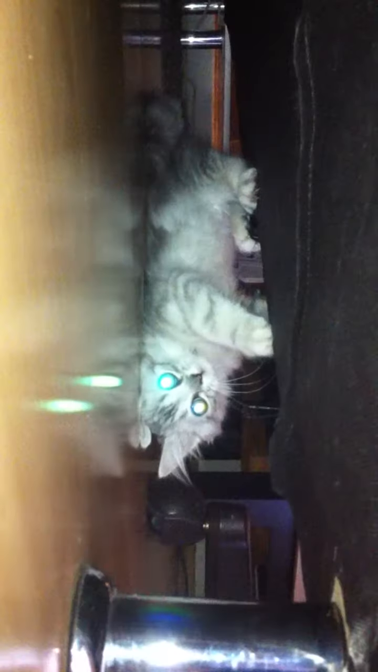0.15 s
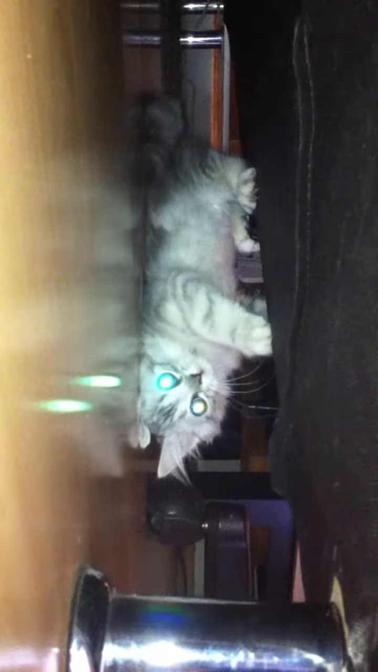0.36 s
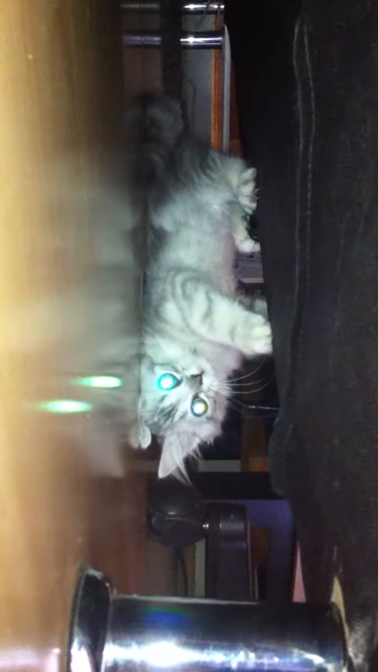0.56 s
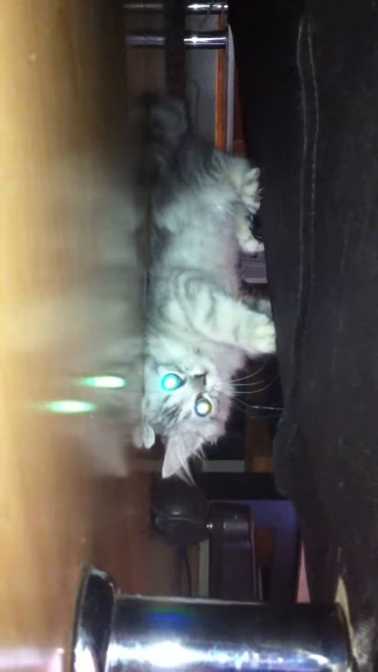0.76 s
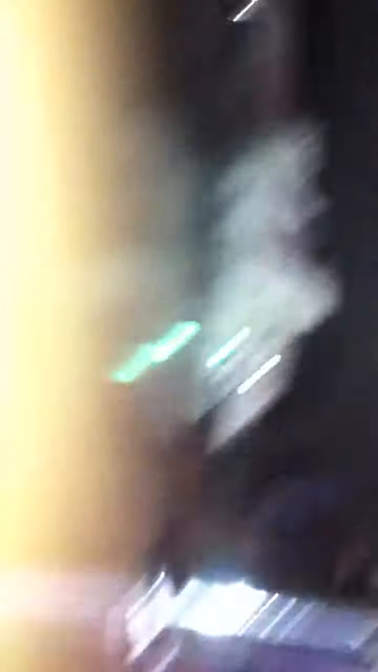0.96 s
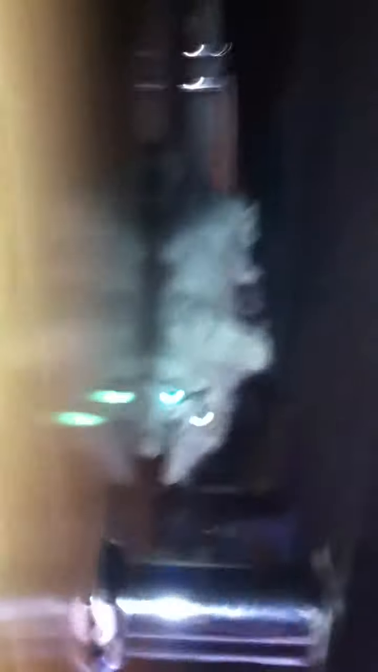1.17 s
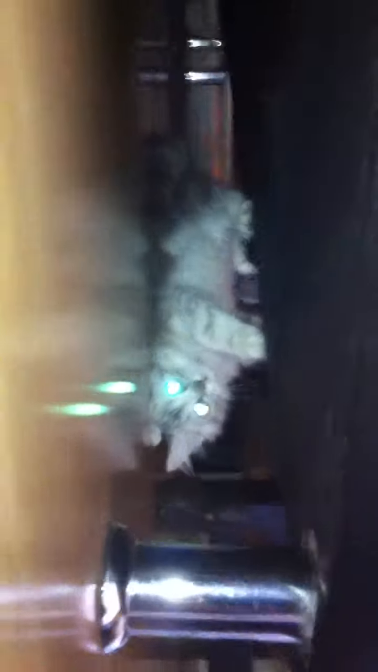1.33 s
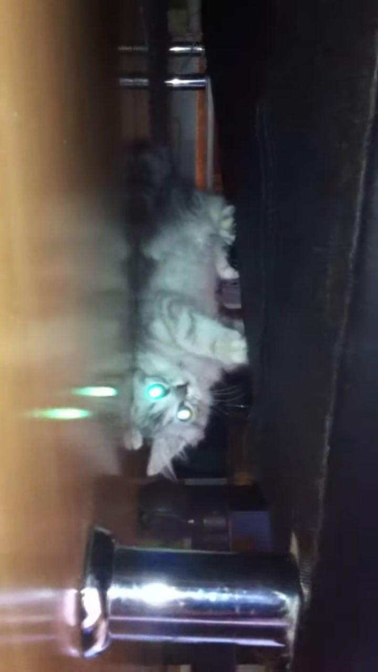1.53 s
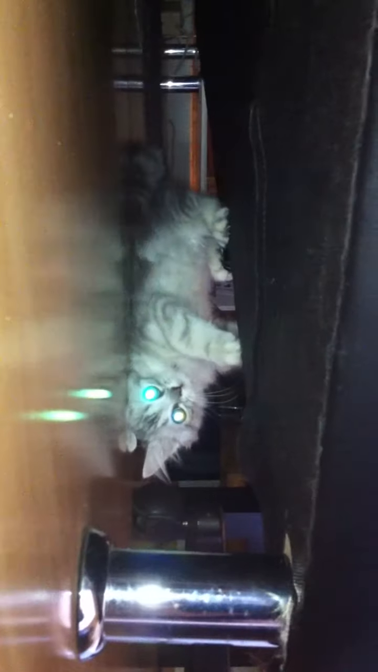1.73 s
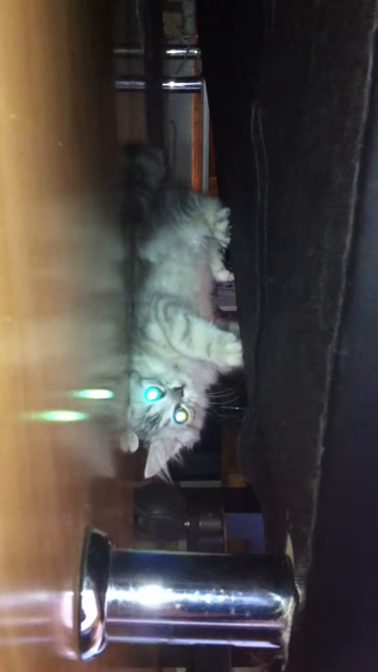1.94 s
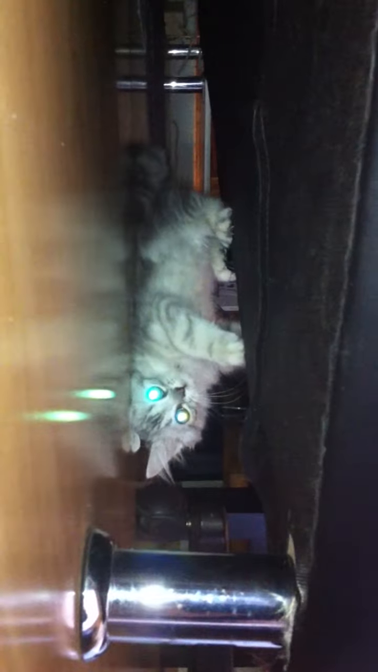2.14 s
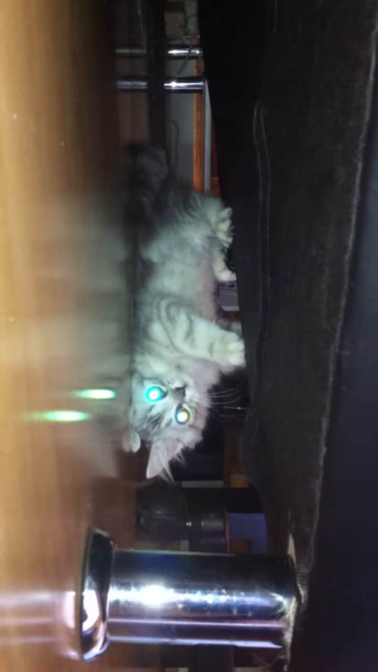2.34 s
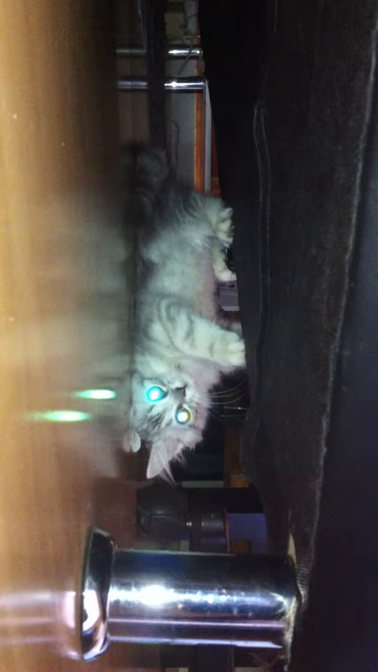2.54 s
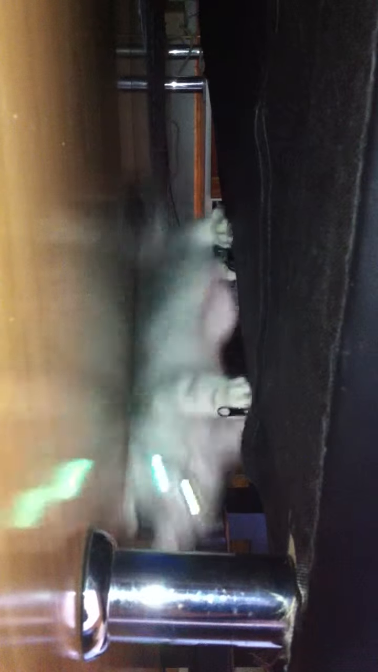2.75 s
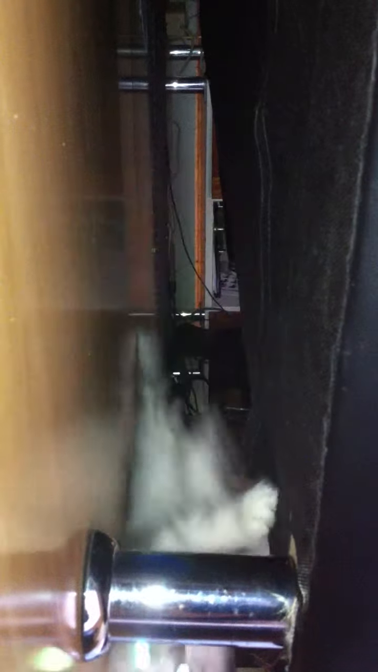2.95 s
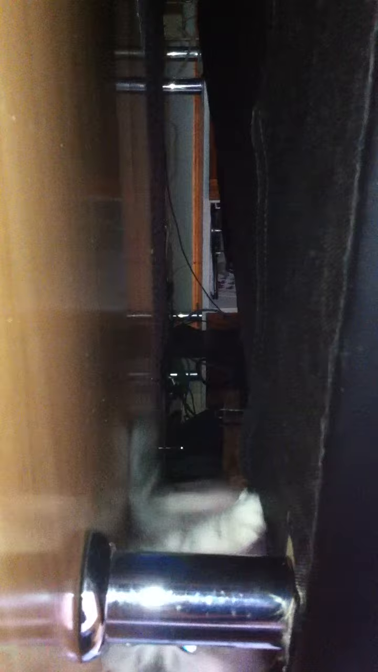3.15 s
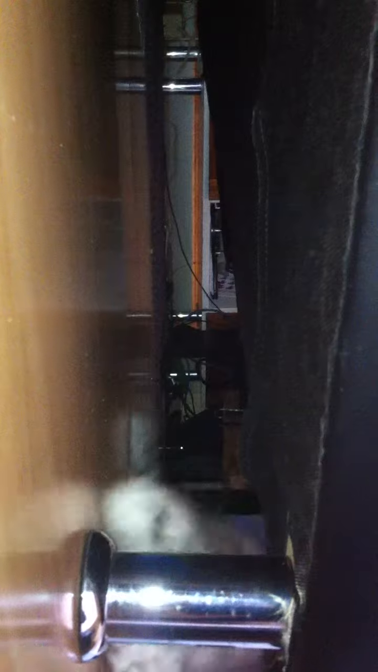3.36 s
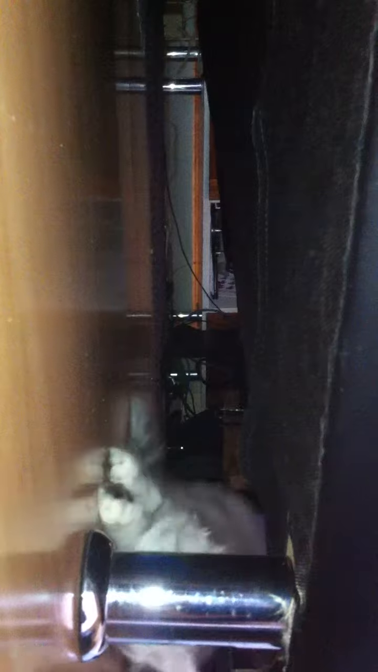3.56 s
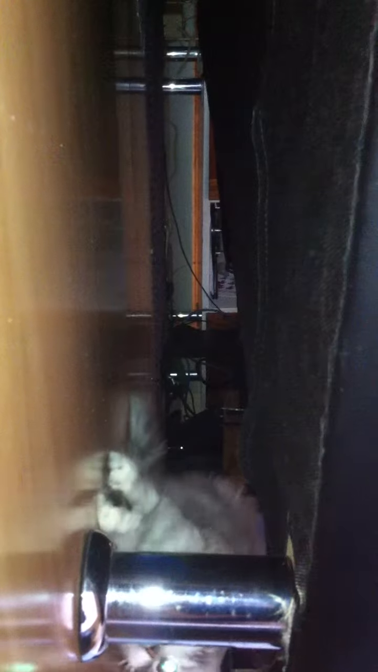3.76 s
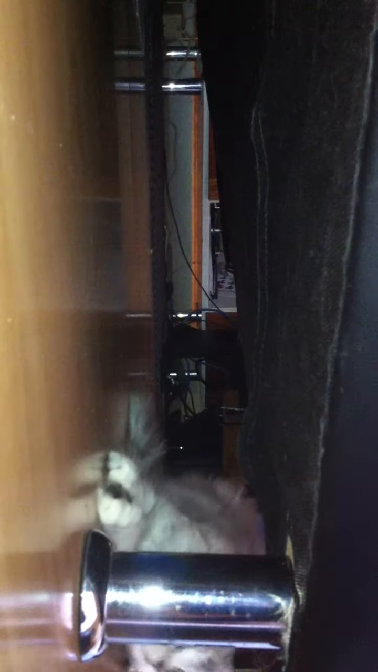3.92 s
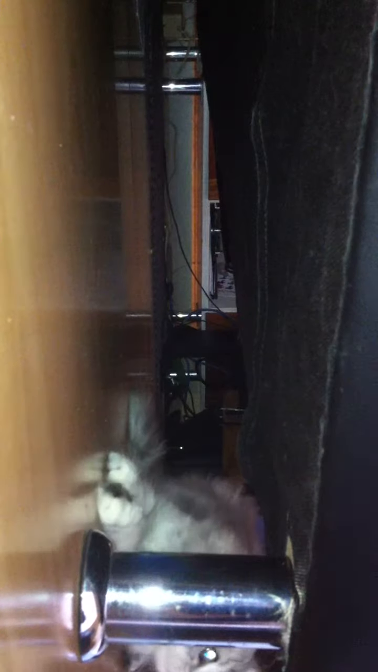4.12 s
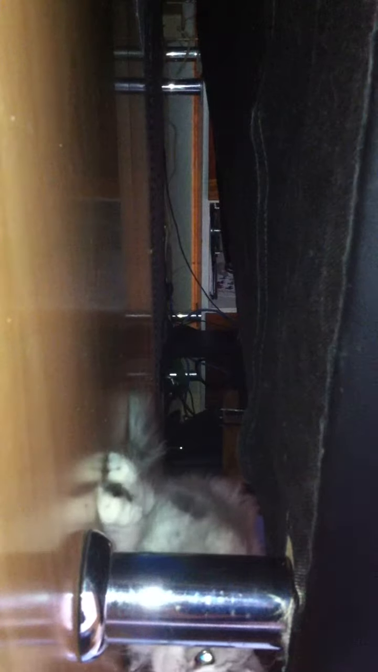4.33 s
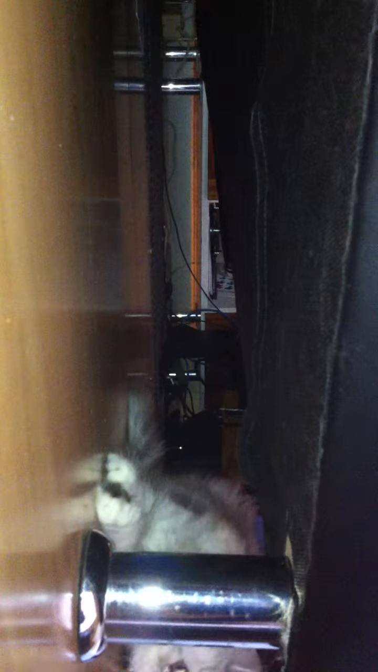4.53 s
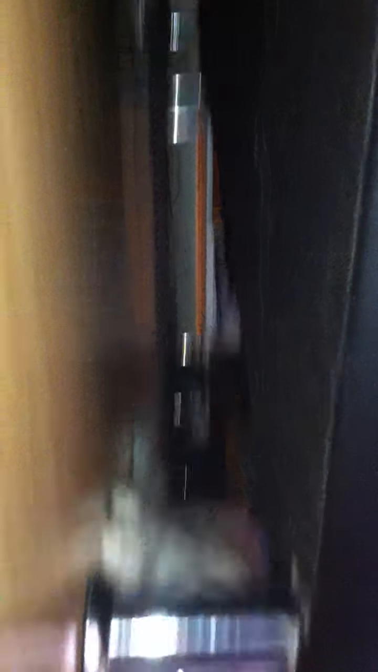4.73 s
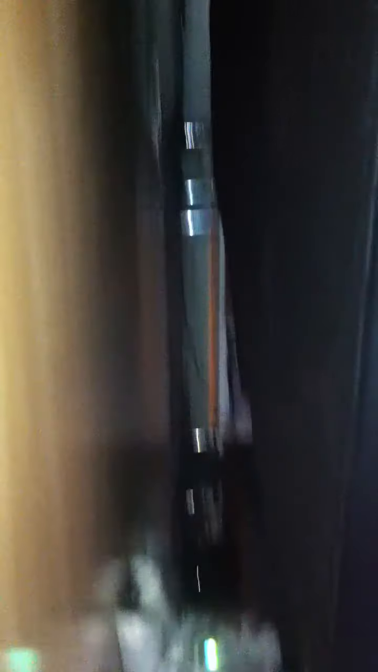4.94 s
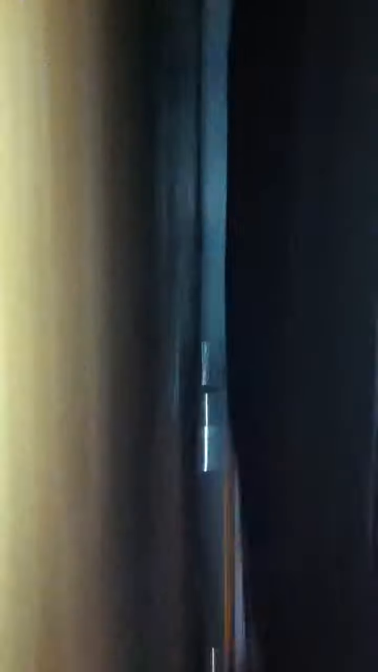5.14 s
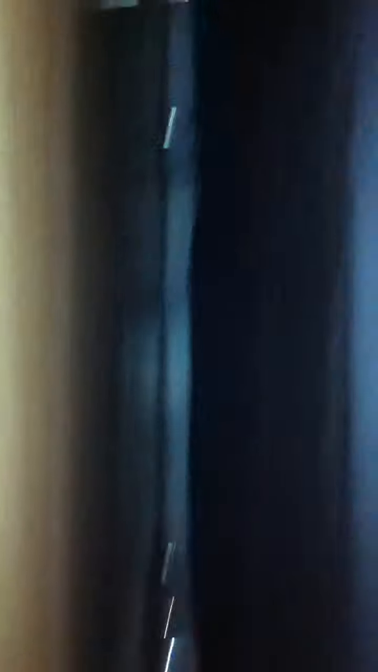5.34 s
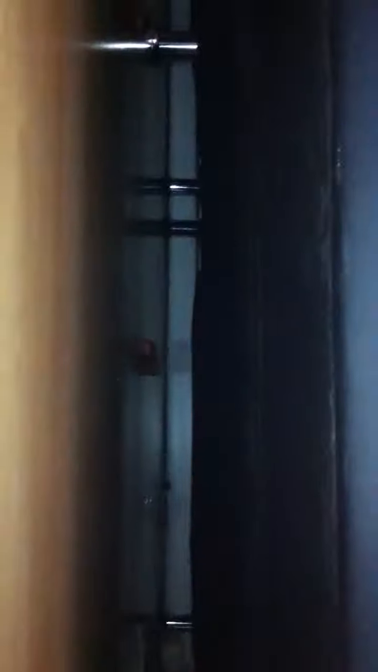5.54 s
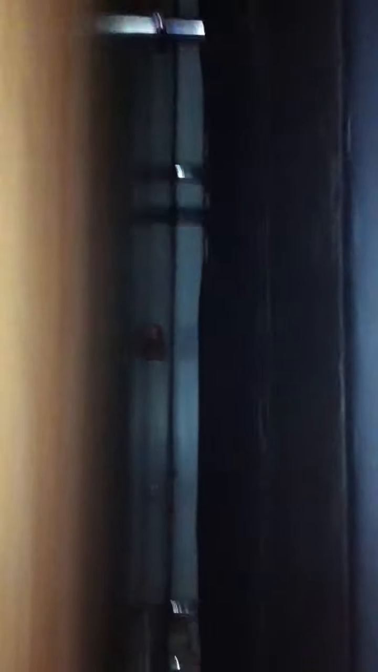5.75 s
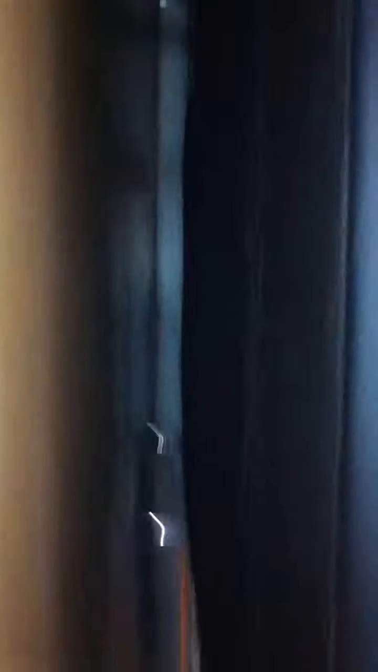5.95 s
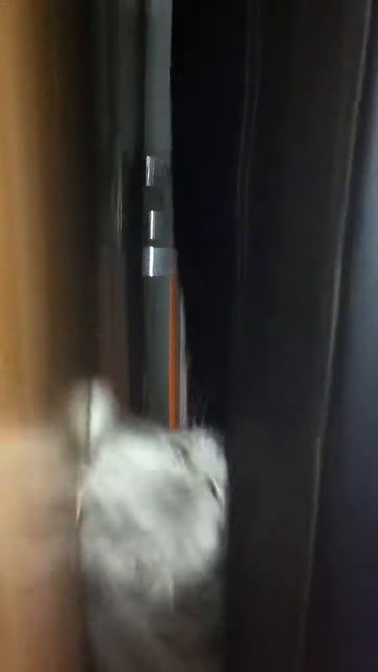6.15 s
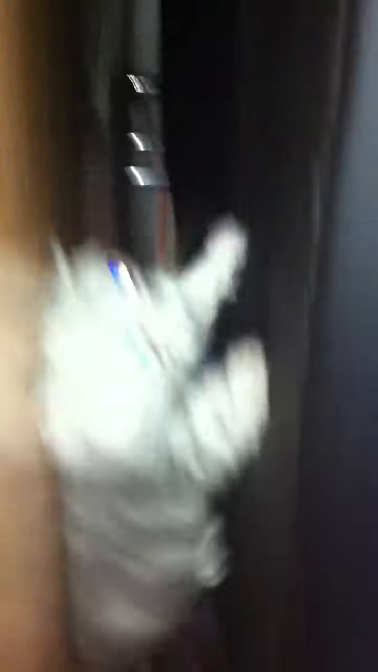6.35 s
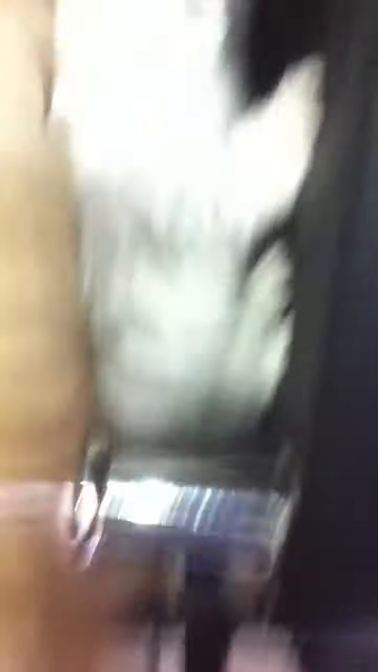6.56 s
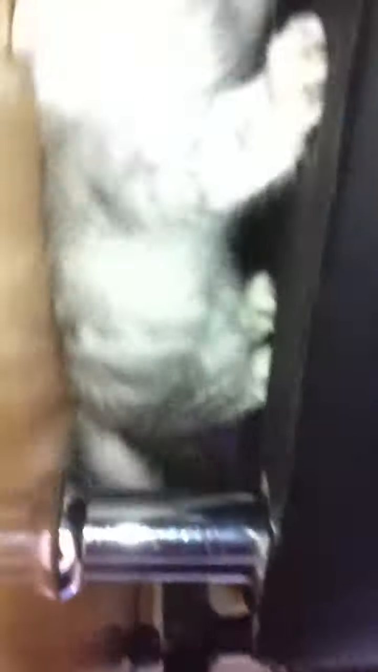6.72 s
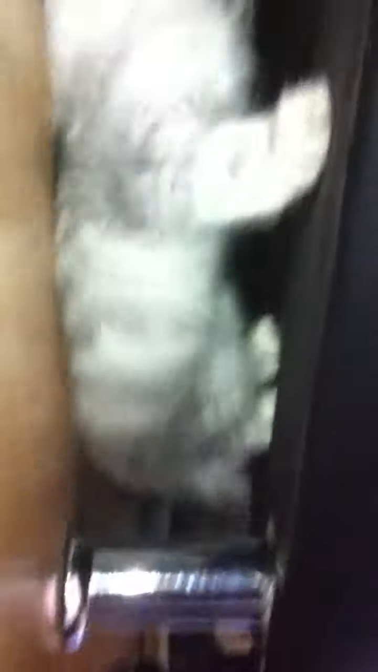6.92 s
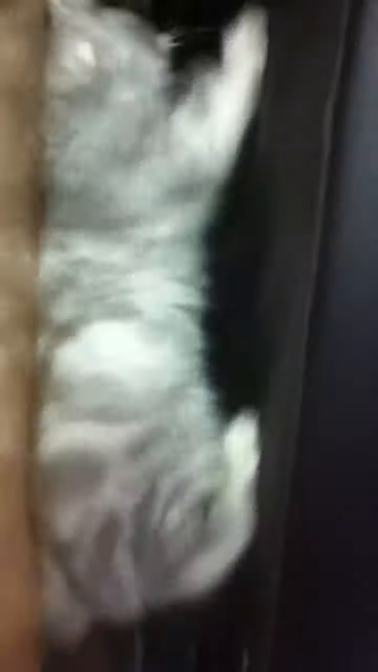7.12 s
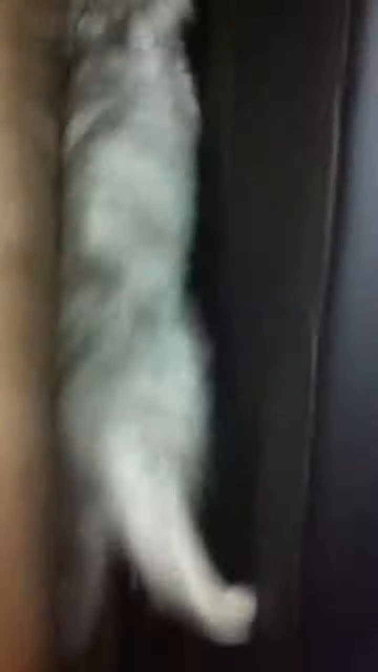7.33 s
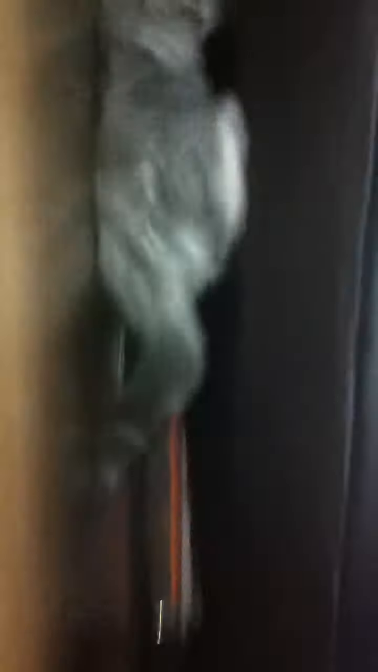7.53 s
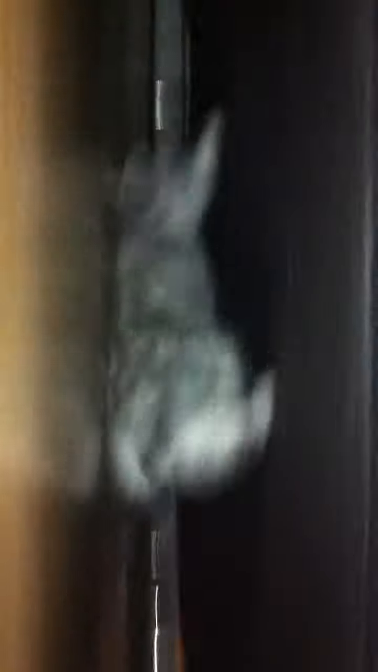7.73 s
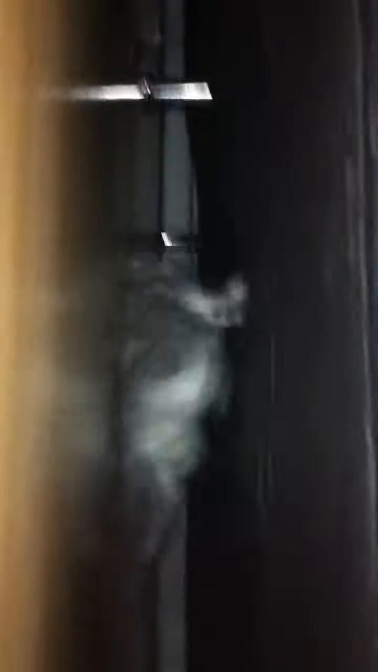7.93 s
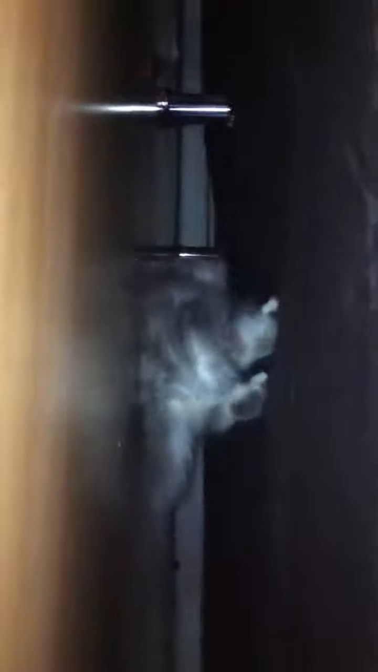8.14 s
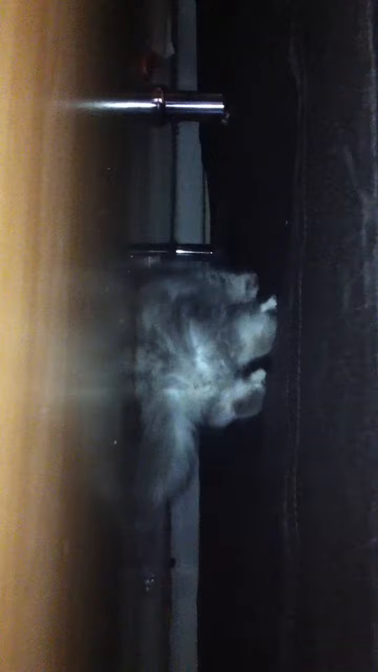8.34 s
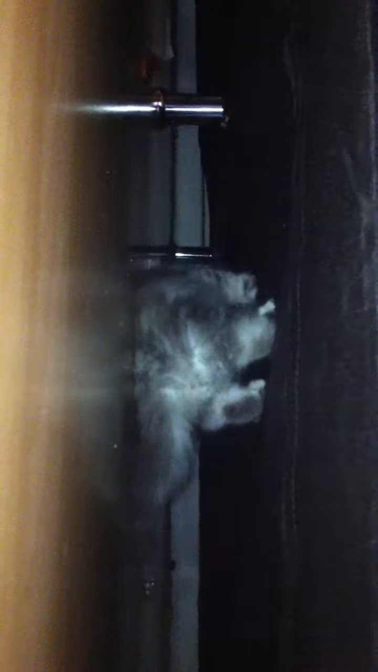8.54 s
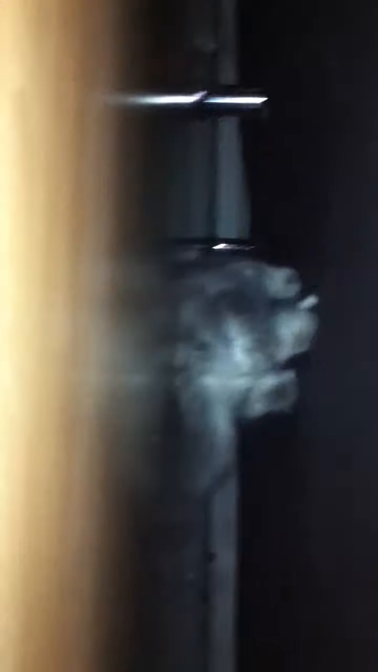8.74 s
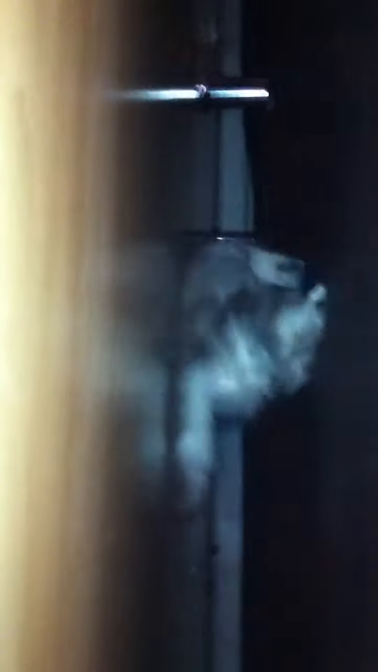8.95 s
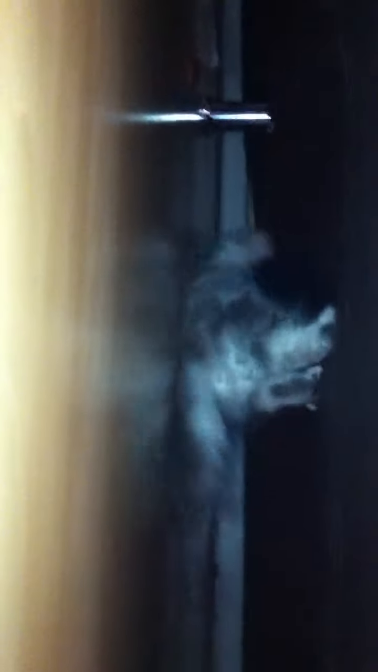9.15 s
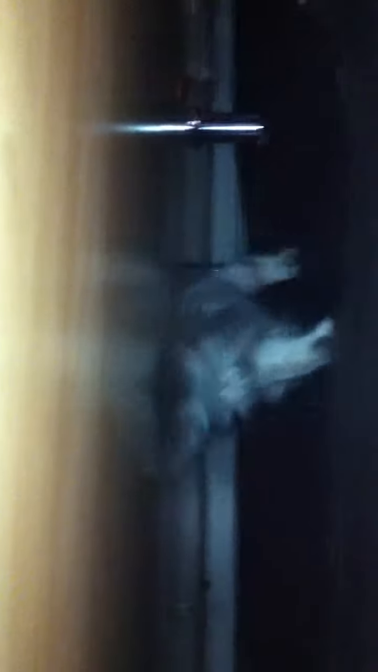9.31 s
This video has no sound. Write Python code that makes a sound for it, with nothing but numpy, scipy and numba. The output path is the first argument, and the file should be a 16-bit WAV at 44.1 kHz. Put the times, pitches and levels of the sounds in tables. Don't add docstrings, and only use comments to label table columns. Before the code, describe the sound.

Short rough slides on a hard floor, paw thumps ringing furniture, claws snagging cloth and dry close knocks, over faint appliance hum and hiss.

```python
import sys
import numpy as np
from scipy import signal
from scipy.fft import rfft, irfft
from scipy.io import wavfile
from scipy.ndimage import uniform_filter1d
from numba import njit

SR = 44100
rng = np.random.default_rng(int(sys.argv[2]) if len(sys.argv) > 2 else 0)


def unload_audio(sound):
    columns = np.transpose(np.atleast_2d(sound))
    steps = np.round(np.clip(columns, -1, 1) * 32767)
    wavfile.write(sys.argv[1], SR, steps.astype(np.int16))


def convert_level_to_amplitude(level_db):
    exponent = np.asarray(level_db, float) / 20
    return 10 ** exponent


N = 418053

# time in [s], speed as hiss
# level in [dB], pressure as rasp level in [dB], shell resonance in [Hz].
SLIDES = [
    [(0.94, -76, -72, 785), (1.084, -54, -42.5, 810), (1.098, -45, -50, 834), (1.104, -50, -42, 806),
     (1.16, -45, -37, 656), (1.25, -44, -37, 1010), (1.282, -45.5, -38.5, 1090), (1.396, -58, -46, 855),
     (1.42, -69, -61, 882)],
    [(4.84, -70, -55, 841), (4.92, -56, -54, 810), (5.032, -53.5, -53.5, 860), (5.166, -44.5, -40, 734),
     (5.324, -43, -43, 794), (5.388, -40.5, -40, 740), (5.476, -44, -46, 710), (5.502, -49.5, -45, 750),
     (5.528, -55.5, -51, 825)],
    [(5.82, -56, -51, 1050), (5.826, -54, -44, 1020), (5.856, -54.5, -48.5, 1080), (5.914, -51, -44, 1110),
     (6.112, -50.5, -42, 915), (6.182, -46, -33.5, 740), (6.232, -45.5, -39.5, 835),
     (6.274, -46, -42.5, 940), (6.33, -48, -41.5, 940)],
    [(6.33, -47, -46, 993), (6.356, -43, -51, 880), (6.364, -42.5, -37, 854), (6.428, -38, -38.5, 900),
     (6.528, -37, -32, 1050), (6.594, -38.5, -31.5, 1070), (6.664, -45, -30.5, 720),
     (6.71, -55, -48.5, 700), (6.74, -50, -45, 780)],
    [(6.78, -61, -60, 890), (6.856, -61.5, -73, 806), (6.916, -59, -60, 860), (6.986, -54.5, -52.5, 830),
     (7.08, -57, -48.5, 900), (7.204, -50, -46, 595), (7.25, -49.5, -48, 730), (7.424, -50, -48.5, 680),
     (7.45, -52, -68, 852)],
    [(7.45, -49.5, -44, 720), (7.492, -49, -39, 830), (7.558, -48, -35, 660), (7.618, -44.5, -36, 736),
     (7.724, -46.5, -40, 750), (7.972, -53.5, -47.5, 875), (8.054, -59.5, -53, 785),
     (8.098, -63.5, -64, 910), (8.2, -68.5, -59.5, 691)],]
STROKES = SLIDES
LIFT_S = 0.02
MEAN_PRESSURE_DB = -43


def rms_one(x):
    return x / np.sqrt(np.mean(x ** 2) + 1e-20)


def at_hz(points, hz):
    points_hz, values = np.transpose(points)
    return np.interp(np.log(hz), np.log(points_hz), values)


def over_time(points, t, **ends):
    return np.interp(t, *np.transpose(points), **ends)


def band(x, low_hz, high_hz, order=2):
    edges_hz = [low_hz, min(high_hz, .45 * SR)]
    return signal.sosfilt(signal.butter(order, edges_hz, "band", fs=SR, output="sos"), x)


def coloured(x, spectrum):
    hz = np.arange(len(x) // 2 + 1) * SR / len(x) + 1
    return rms_one(irfft(rfft(x) * convert_level_to_amplitude(at_hz(spectrum, hz)), len(x)))


def tilt(x, corner_hz, upper_gain):
    low_pass = signal.butter(2, corner_hz, fs=SR, output="sos")
    high_pass = signal.butter(2, corner_hz, "high", fs=SR, output="sos")
    low = signal.sosfilt(np.vstack([low_pass] * 2), x)
    high = signal.sosfilt(np.vstack([high_pass] * 2), x)
    return low + upper_gain * high


def drift(rate_hz):
    control_hz = 200
    count = int(N / SR * control_hz) + 2
    r = np.exp(-2 * np.pi * rate_hz / control_hz)
    slow = signal.lfilter([1], [1, -2 * r, r * r], rng.standard_normal(count + 400))[400:]
    return np.interp(np.arange(N) / SR * control_hz, np.arange(count), rms_one(slow))


def grit(per_s, spread_db):
    sizes = convert_level_to_amplitude(spread_db * np.minimum(rng.exponential(1, N), 4.2)) * rng.choice([-1, 1], N)
    return sizes * (rng.random(N) < per_s / SR)


def resonance(x, hz, width_hz):
    r = np.exp(-np.pi * width_hz / SR)
    return signal.lfilter([(1 - r * r) / 2, 0, (r * r - 1) / 2], [1, -2 * r * np.cos(2 * np.pi * hz / SR), r * r], x)


def double_resonance(x, hz, width_hz):
    return rms_one(resonance(resonance(x, hz, width_hz), hz, width_hz))


@njit
def moving_resonance(x, cosine, r):
    y = np.zeros(len(x))
    for i in range(2, len(x)):
        y[i] = x[i] - x[i - 2] + 2 * r * cosine[i] * y[i - 1] - r * r * y[i - 2]
    return y


def gliding_note(grains, hz, widths_hz):
    for width_hz in widths_hz:
        grains = moving_resonance(grains, np.cos(2 * np.pi * hz / SR), np.exp(-np.pi * width_hz / SR))
    return grains / np.sqrt(uniform_filter1d(grains ** 2, size=4000) + 1e-9)


def ring(clicks, hz, t60_s):
    r, w = convert_level_to_amplitude(-60 / (t60_s * SR)), 2 * np.pi * hz / SR
    return signal.lfilter([0, np.sin(w)], [1, -2 * r * np.cos(w), r * r], clicks + 1e-18)


def room():
    # frequency in [Hz], density in [dB per Hz]; level in [dB].
    air_spectrum, air_db = [(12, -45), (20, -14), (30, -21), (45, -25), (81, -22.5), (107, -21), (149, -6),
                            (247, -3.5), (397, -11), (524, -10.5), (570, -11), (1020, -13.5), (1150, -12),
                            (2240, -17.5), (3700, -24.5), (10000, -30), (15800, -29)], -62.5
    # centre in [Hz], width in [Hz], level in [dB].
    hum_bands = [(246.6, 5.5, -74), (790, 9.5, -78.5), (1200, 6.8, -83.5), (2290, 1700, -98)]
    # level in [dB], waver in [dB].
    tones_hz = (118.4, 2272)
    tone_levels = [(-73, 1.0), (-79, 2.0)]
    # time in [s], level in [dB].
    whine_fade = [(0, 1), (7.5, 0.1), (8.2, 0), (8.7, -6), (9.4, -7)]
    # time in [s], level in [dB].
    engine_swell = [
        (7.9, -100),
        (8.4, -102),
        (9.2, -85),
        (9.48, -74),
    ]
    t = np.arange(N) / SR
    hums = sum(convert_level_to_amplitude(db) * double_resonance(rng.standard_normal(N), hz, width_hz)
               for hz, width_hz, db in hum_bands)
    tones = np.zeros(N)
    for hz, (db, waver_db) in zip(tones_hz, tone_levels):
        level_db = db + 3.0 + waver_db * drift(1.9)
        if hz > 1000:
            level_db = level_db + over_time(whine_fade, t)
        tones += convert_level_to_amplitude(level_db) * np.sin(2 * np.pi * hz * t + 0.33 * drift(0.89))
    engine = convert_level_to_amplitude(over_time(engine_swell, t)) * double_resonance(rng.standard_normal(N), 73, 9.2)
    air = convert_level_to_amplitude(air_db + .4 * drift(2.5)) * coloured(rng.standard_normal(N), air_spectrum)
    return air + hums + tones + engine


def furniture(pushes):
    # mode in [Hz], level in [dB], t60 in [s].
    frame_modes = [(258, -15, 0.24), (398, -2, 0.31), (647, -2, 0.34), (724, -6, 0.35), (915, -8, 0.23),
                   (1240, -42, 0.18), (1430, 7.5, 0.22), (1580, -41, 0.86), (2140, -12, 0.38)]
    # frequency in [Hz], t60 in [s].
    echo_t60 = [(200, 0.48), (1000, 0.48), (4000, 0.11), (12000, 0.11)]
    out = np.zeros(N)
    uneven_db = rng.normal(0, 5.8, (len(frame_modes), N // 64 + 1))
    for strike_db, (hz, db, t60_s) in zip(uneven_db, frame_modes):
        strikes = pushes * np.repeat(convert_level_to_amplitude(strike_db), 64)[:N]
        out += ring(strikes, hz, t60_s * min(.9, 350 / hz)) * convert_level_to_amplitude(db - 15.5)
    t = np.arange(SR // 2) / SR
    echo = np.zeros(len(t))
    for k, low_hz in enumerate(150 * 2. ** np.arange(7)):
        decay = convert_level_to_amplitude(-60 * t / at_hz(echo_t60, np.sqrt(2) * low_hz) - 5.04 * k)
        echo += band(rng.standard_normal(len(t)) * decay, low_hz, 2 * low_hz)
    return out + convert_level_to_amplitude(10.0) * signal.fftconvolve(pushes, echo)[:N]


def blows(events, t60_at_400hz_s, contact_s, tick_s, tick_top_hz, glide_cycles):
    soft_spread = 0.19
    hard_damping = 0.26
    out, into_frame = np.zeros(N + SR), np.zeros(N)
    t = np.arange(SR // 5) / SR
    for start_s, db, hz, tick_db, ring_db in events:
        i = int((start_s + .0017) * SR)
        touch_s = contact_s * convert_level_to_amplitude(-soft_spread * (tick_db + 35.5))
        push = -np.exp(-.5 * ((t - 2.8 * touch_s) / touch_s) ** 2)
        late = np.maximum(t - 5.2 * touch_s, 0)
        cycles = hz * late + glide_cycles * (1 - np.exp(-late / 0.0017))
        t60_s = t60_at_400hz_s * (400 / hz) ** 0.68 * convert_level_to_amplitude(-hard_damping * (db + 31.0))
        thud = np.sin(2 * np.pi * cycles) * convert_level_to_amplitude(-60 * late / t60_s)
        tick = band(rng.standard_normal(len(t)) * convert_level_to_amplitude(-60 * t / tick_s), 1800, tick_top_hz)
        out[i:i + len(t)] += convert_level_to_amplitude(db) * (push + 0.85 * thud + convert_level_to_amplitude(tick_db) * tick)
        into_frame[i] = convert_level_to_amplitude(db + ring_db)
    return out[:N], into_frame


def body_bumps():
    # start in [s], peak in [dB], thud in [Hz].
    bump_rows = [(1.693, -61, 230), (4.989, -45, 168), (5.021, -36, 183), (5.088, -42, 290),
                 (5.364, -40.5, 191), (5.679, -43.5, 140), (6.03, -42, 167), (6.101, -47, 186),
                 (6.38, -39, 176), (6.65, -33, 171), (7.044, -42, 149), (7.07, -36, 198), (7.092, -35, 200),
                 (7.115, -37, 210), (7.143, -37, 168), (7.191, -32, 183), (7.223, -31, 300),
                 (7.209, -27, 250), (7.241, -30.5, 257), (7.249, -31, 190), (7.262, -36, 250)]
    tick_db, ring_db = -45.5, -16.5
    return blows([(*row, tick_db, ring_db) for row in bump_rows], 0.045, contact_s=0.00038,
                 tick_s=.02, tick_top_hz=3000, glide_cycles=0.14)


def leg_slam():
    # start in [s], peak in [dB], thud in [Hz], tick in [dB rel], furniture ring in [dB rel].
    slam_rows = [
        (3.444, -20, 272, -37, -26),
    ]
    return blows(slam_rows, 0.071, contact_s=0.00013, tick_s=.02, tick_top_hz=2500, glide_cycles=1.64)


def paw_knocks():
    # start in [s], peak in [dB], thud in [Hz], tick in [dB rel], furniture ring in [dB rel].
    paw_rows = [(2.737, -36, 900, -18, -11), (2.743, -34, 990, -13, -33), (2.815, -52, 1200, -10, -20),
                (2.882, -34, 840, -12, -41), (2.886, -26, 666, -21, -14.5), (2.899, -29, 764, -39, -36),
                (2.95, -21, 680, -12.5, -14), (2.957, -30, 778, -27, -28), (2.978, -39, 480, -18, -25),
                (3.029, -38, 350, -15, -25), (3.075, -49, 369, 3, -20), (3.167, -39, 596, -23, -12),
                (3.19, -46.5, 735, -14, -3), (3.225, -45.5, 353, -23, -5), (3.421, -20, 596, -11, -11.5),
                (8.63, -40, 494, -10, -16), (8.835, -54, 323, 2, -21), (9.102, -43.5, 288, -4, -6.5)]
    return blows(paw_rows, 0.025, contact_s=.0001, tick_s=0.0063, tick_top_hz=10500, glide_cycles=0.017)


def case_knocks():
    # start in [s], peak in [dB], thud in [Hz], tick in [dB rel].
    knock_rows = [(1.092, -18, 1210, -10), (1.095, -16, 217, -55), (1.23, -22, 1060, 0),
                  (1.254, -24, 1050, -9), (1.672, -39.5, 474, -5), (5.551, -35, 910, -22),
                  (5.621, -41, 350, -14), (5.829, -48, 1040, -23), (6.7452, -11, 230, -16),
                  (7.155, -26.5, 248, -5), (7.292, -29, 297, -5), (7.366, -26.5, 695, -7),
                  (7.393, -14, 228, -42), (7.467, -24.5, 603, -21), (7.845, -20, 830, -37),
                  (7.878, -28.5, 272, -38), (8.089, -34.5, 147, -7), (8.126, -40, 163, -9),
                  (8.142, -34.5, 182, -4), (8.159, -36, 151, -12), (8.1862, -35.5, 258, -14),
                  (9.138, -36, 165, -18), (9.326, -38.5, 147, -8), (9.349, -31, 144, -12),
                  (9.373, -30, 135, -11), (9.422, -38, 900, -21), (9.4261, -30.5, 940, -21)]
    ring_db = -21
    return blows([(*row, ring_db) for row in knock_rows], 0.016, contact_s=0.00017,
                 tick_s=0.017, tick_top_hz=4630, glide_cycles=0.024)


def snags():
    # start in [s], peak in [dB], colour in [Hz], length in [s].
    snag_rows = [(0.993, -50, 5000, .006), (1.038, -43, 4550, 0.011), (2.798, -46, 3800, 0.013),
                 (2.812, -50, 4850, 0.013), (3.08, -47, 3330, 0.015), (3.381, -48.5, 3800, 0.0087),
                 (5.548, -47, 2820, 0.01), (5.565, -46, 2900, 0.011), (5.58, -42, 3500, 0.015),
                 (5.58, -43, 5200, 0.01), (5.61, -49, 3600, 0.018), (7.207, -41, 2920, 0.022),
                 (8.934, -61, 3290, 0.012), (9.097, -57, 2500, 0.0072), (9.102, -45.5, 4020, 0.0073),
                 (9.182, -55, 2520, 0.012), (9.422, -59, 4270, 0.0093)]
    out, t = np.zeros(N + SR), np.arange(SR // 10) / SR
    for start_s, db, hz, length_s in snag_rows:
        snaps = rng.standard_normal(len(t)) * convert_level_to_amplitude(7.8 * rng.standard_normal(len(t)))
        swell = (t / length_s) * np.exp(1 - 3 * t / length_s)
        burst = band(snaps * swell, 0.73 * hz, 1.21 * hz)
        i = int(start_s * SR)
        out[i:i + len(t)] += convert_level_to_amplitude(db) * burst / np.abs(burst).max()
    return out[:N]


def swishes():
    # start in [s], length in [s], level in [dB], from pitch in [Hz], to pitch in [Hz].
    swish_rows = [(3.737, 0.28, -65, 326, 274), (4.085, 0.17, -61.5, 225, 215),
                  (4.85, 0.31, -59, 2060, 2380), (5.06, 0.13, -51, 476, 510), (5.304, .12, -47, 2010, 2400),
                  (1.12, 0.11, -43.5, 620, 700), (1.2, 0.081, -45, 1000, 1150),
                  (5.842, 0.11, -46, 1140, 1400), (6.146, 0.073, -36.5, 810, 740),
                  (6.379, 0.11, -47, 2000, 2200), (7.831, .06, -42, 900, 800), (7.57, 0.098, -37, 840, 790),
                  (7.75, 0.11, -45.5, 1100, 1050), (6.24, 0.12, -47, 2210, 2300),
                  (6.464, 0.24, -47, 1880, 1100), (6.598, 0.088, -38, 790, 560),
                  (7.408, 0.057, -55, 5400, 5600), (7.42, 0.038, -47, 1500, 1700),
                  (7.54, 0.083, -38, 560, 520), (8.95, 0.16, -68, 2300, 3500), (9.16, 0.092, -63, 800, 650)]
    out, size = np.zeros(N + SR), SR // 2
    for start_s, length_s, db, from_hz, to_hz in swish_rows:
        grains = rng.standard_normal(size) * convert_level_to_amplitude(3.8 * rng.standard_normal(size))
        along = np.minimum(np.arange(size) / SR / length_s, 1)
        note = gliding_note(grains, from_hz + (to_hz - from_hz) * along, [0.23 * from_hz] * 2)
        i = int(start_s * SR)
        out[i:i + size] += convert_level_to_amplitude(db) * np.sin(np.pi * along) * note
    return out[:N]


def claw_drag():
    # band centre in [Hz], width in [Hz], level in [dB].
    case_bands = [(830, 49, -2), (1620, 130, 2.5), (2560, 34, -5), (3330, 260, -3.5), (4260, 80, -4),
                  (4910, 32, -9)]
    # time in [s], level in [dB].
    drag_level = [(9.422, -52), (9.435, -55), (9.445, -51), (9.458, -38), (9.468, -40), (9.48, -41)]
    slips = grit(per_s=5000.0, spread_db=4.5)
    bands = sum(convert_level_to_amplitude(db) * double_resonance(slips, hz, 3.2 * width_hz) for hz, width_hz, db in case_bands)
    return rms_one(bands) * convert_level_to_amplitude(over_time(drag_level, np.arange(N) / SR, left=-120))


def pings():
    # start in [s], peak in [dB], pitch in [Hz], t60 in [s].
    ping_rows = [(1.6733, -17, 1010, 0.0017), (2.739, -34, 1490, 0.0074), (2.744, -36.5, 676, .02),
                 (2.755, -42, 780, .03), (2.766, -43, 900, .02), (2.816, -50, 1500, .02),
                 (2.862, -45, 420, 0.028), (2.882, -31, 1090, 0.0093), (2.912, -36, 756, 0.033),
                 (2.93, -41, 860, 0.033), (2.99, -42, 520, 0.037), (3.421, -38, 3680, 0.011),
                 (3.423, -37, 4730, .012), (3.469, -41.5, 258, 0.21), (5.551, -43, 2870, .02),
                 (5.52, -27.5, 1510, 0.0054), (5.553, -52, 850, 0.17), (9.425, -53, 4400, 0.014),
                 (5.555, -31, 247, 0.014), (5.829, -30.5, 1040, .02), (5.835, -30, 1000, .012),
                 (7.158, -31.5, 715, 0.043), (7.1937, -17, 467, 0.023), (7.1932, -13, 193, 0.075),
                 (7.395, -27, 4500, 0.0034), (7.394, -42, 8500, .003), (3.191, -44, 1500, 0.0045),
                 (2.815, -44, 5000, .006), (7.368, -44, 910, .03), (7.4675, -30, 816, .018),
                 (7.879, -35, 800, .02), (9.427, -33, 950, .01), (8.09, -44, 3200, .004),
                 (5.552, -37, 890, .025), (9.424, -35, 1640, 0.022), (9.424, -51, 2560, 0.018),
                 (8.0888, -30.5, 1550, .005), (8.1275, -38, 1350, .006), (8.131, -35, 1300, .006),
                 (8.144, -56, 3470, .008), (8.159, -39, 1500, .006), (8.163, -50, 3900, .01),
                 (9.1, -42, 1800, .005), (9.139, -39, 1600, .006), (9.327, -44, 2820, .006),
                 (9.35, -44, 1400, .006), (9.375, -32.5, 1490, 0.0087), (8.63, -48, 2800, .008),
                 (8.934, -52, 3300, .008), (7.296, -40, 650, 0.037), (6.7468, -26, 1700, .003)]
    rise_cycles = 0.29
    out, t = np.zeros(N + SR), np.arange(SR // 5) / SR
    for start_s, db, hz, t60_s in ping_rows:
        rise = 1 - np.exp(-t * hz / rise_cycles)
        i = int(start_s * SR)
        out[i:i + len(t)] += convert_level_to_amplitude(db - 60 * t / t60_s) * rise * np.sin(2 * np.pi * hz * t)
    return out[:N]


def surfaces(t):
    # rattle, hiss and rumble above their corners in [dB], shell focus in [dB].
    surface_rows = [(9.5, 4.5, -3, -5), (12.5, 2.5, 0, -5.5), (-5.5, -1.2, -11.5, -3.5), (4, -0.3, 3, 3.5),
                    (-4, 3.4, 0.1, -2.5), (1, 4.3, -5.5, 2)]
    gains = np.ones((4, N))
    for stroke, row in zip(STROKES, surface_rows):
        under = (t > stroke[0][0] - .006) & (t < stroke[-1][0] + LIFT_S)
        gains[:, under] = convert_level_to_amplitude(np.array(row))[:, None]
    return gains


def slide_controls(t):
    # rattle in [dB rel speed], rumble at mean pressure in [dB],
    # lower and upper shell notes in [dB rel pressure].
    grip_rows = [(-5, -48, -10.5, -26), (-1, -50.5, -19, -25), (3.5, -49, -21, -20),
                 (3.5, -51.5, -22, -14.5), (6, -48, -8.5, -15), (-1.5, -45.5, -5, -17.5)]
    # peak time in [s], length in [s], rasp in [dB],
    # hiss in [dB rel], rumble in [dB rel].
    rustle_rows = [(1.693, 0.029, -54.5, -7, -1), (2.79, 0.15, -57, -10.5, -20),
                   (2.925, 0.11, -55, -9, -10), (3.042, 0.18, -58, -10, -16), (3.213, 0.087, -60, -17, 0),
                   (3.477, 0.15, -64, -5.5, -17), (3.625, 0.23, -74, -18, 12.5),
                   (4.133, 0.24, -77.5, -12, 10.5), (5.6, 0.11, -69.5, 4, 12), (5.787, 0.15, -56.5, 0, -4),
                   (9.084, 0.079, -73, 7.5, 11), (8.29, 0.17, -76, 0, 11.5), (8.646, 0.17, -76.5, 2.5, 13),
                   (8.954, 0.62, -80, 5.5, 13.5), (9.164, 0.082, -72, 5.5, 15),
                   (9.207, 0.16, -70, -12, 14.5), (9.346, 0.11, -65, 4, 16),
                   (9.456, 0.038, -44.5, -21, -12), (9.478, 0.059, -45.5, -6.5, -9)]
    rumble_follows = 0.6
    rattle_follows, crawl_speed_db = 0.8, -76
    rattle_db_per_octave = 21
    rise_share, fade_db, rustle_rattle_db = 0.83, 22.5, -1
    gains, shell_hz = np.zeros((6, N)), np.full(N, 780.0)
    for stroke, (rattle_db, rumble_db, belly_db, rim_db) in zip(STROKES, grip_rows):
        s, *columns = np.transpose(stroke)
        moving = np.interp(t, [s[0] - .006, s[0], s[-1], s[-1] + LIFT_S], [0, 1, 1, 0])
        speed_db, pressure_db, hz = (np.interp(t, s, c) for c in columns)
        shell_hz = np.where(moving > 0, hz, shell_hz)
        boards_db = rumble_db + rumble_follows * (pressure_db - MEAN_PRESSURE_DB)
        case_db = crawl_speed_db + rattle_follows * (speed_db - crawl_speed_db) + rattle_db
        case_db = case_db + rattle_db_per_octave * np.log2(hz / 850)
        levels_db = [boards_db, pressure_db, case_db, speed_db, pressure_db + belly_db, pressure_db + rim_db]
        gains = np.maximum(gains, moving * convert_level_to_amplitude(np.array(levels_db)))
    for peak_s, length_s, db, hiss_db, rumble_db in rustle_rows:
        away_s = np.maximum(t - peak_s, (peak_s - t) / rise_share)
        swell = convert_level_to_amplitude(db - fade_db * (away_s / length_s) ** 2)
        layers_db = np.array([rumble_db, 0, hiss_db + rustle_rattle_db, hiss_db, -12, -15])
        gains = np.maximum(gains, swell * convert_level_to_amplitude(layers_db)[:, None])
    return gains, shell_hz


def sliding():
    # frequency in [Hz], density in [dB per Hz].
    case_spectrum = [(700, -55), (1300, 7), (1800, 5), (2500, 5), (3100, 0), (4000, -11.5), (7000, -37)]
    # frequency in [Hz], density in [dB per Hz].
    hiss_spectrum = [(1470, -39), (2500, -1.5), (3200, -1), (4490, -3.5), (5890, -4), (7140, -7.5),
                     (8790, -8), (12800, -12), (15200, -13), (15800, -43)]
    # ratio to the shell resonance [1], width in [Hz].
    shell_notes = [
        (0.582, 326),
        (2.2, 950),
    ]
    t = np.arange(N) / SR
    (boards, body, case, air, belly, rim), shell_hz = slide_controls(t)
    crisp, bright, firm, focused = surfaces(t)
    judder = drift(8.7)
    coarse = grit(per_s=4000., spread_db=3.0)
    fine = grit(per_s=14000., spread_db=2.0)
    rumble = tilt(rms_one(band(grit(per_s=400., spread_db=1.0), 124, 436)), 239, firm)
    shell = gliding_note(coarse, shell_hz, [750, 600])
    focus = focused * (body / convert_level_to_amplitude(MEAN_PRESSURE_DB) + .01) ** 0.34
    rasp = focus * rms_one(band(shell, 105, 1530)) + 1.34 * rms_one(band(coarse, 507, 1634))
    rasp = rasp / (focus + 1.34) * 1.163
    deep, high = (gliding_note(coarse, ratio * shell_hz, [width_hz] * 2) for ratio, width_hz in shell_notes)
    high = tilt(high, 3100, convert_level_to_amplitude(-14))
    rattle = tilt(coloured(coarse + fine, case_spectrum), 2500, crisp)
    hiss = tilt(coloured(fine + 0.042 * coarse, hiss_spectrum), 7400, bright)
    out = belly * deep + rim * high
    out += boards * rumble * convert_level_to_amplitude(0.58 * drift(77))
    out += body * rasp * convert_level_to_amplitude(0.32 * judder + 0.78 * drift(37))
    out += case * rattle * convert_level_to_amplitude(0.2 * judder + 2.0 * drift(25))
    out += air * hiss * convert_level_to_amplitude(.5 * judder + 1.0 * drift(33))
    return out


def scene():
    action = sliding() + claw_drag() + snags() + swishes() + pings()
    pushes = np.zeros(N)
    for source in (case_knocks, paw_knocks, body_bumps, leg_slam):
        direct, into_frame = source()
        action += direct
        pushes += into_frame
    action += furniture(pushes)
    bass_cut = signal.butter(3, 115, "high", fs=SR, output="sos")
    return (signal.sosfilt(bass_cut, action) + room())[None]


def band_limit(x):
    return signal.sosfilt(signal.butter(12, 16500, fs=SR, output="sos"), x)


def record(dry):
    top_cut = signal.cheby2(18, 45, 16000, fs=SR, output="sos")
    return band_limit(signal.sosfilt(top_cut, dry))


dry = scene()
out = record(dry)
unload_audio(out)
```